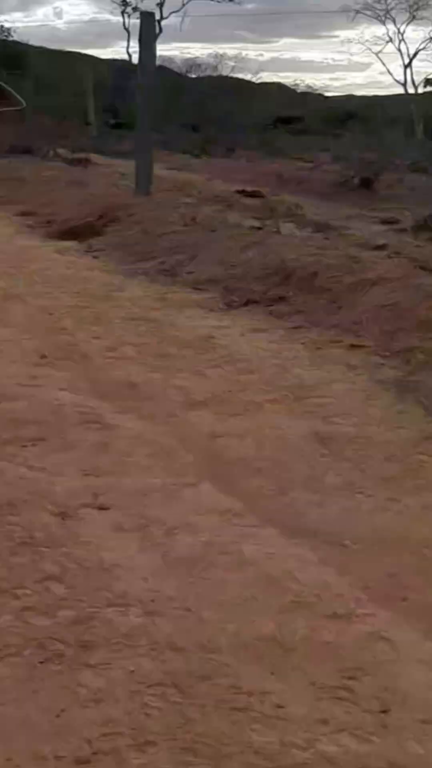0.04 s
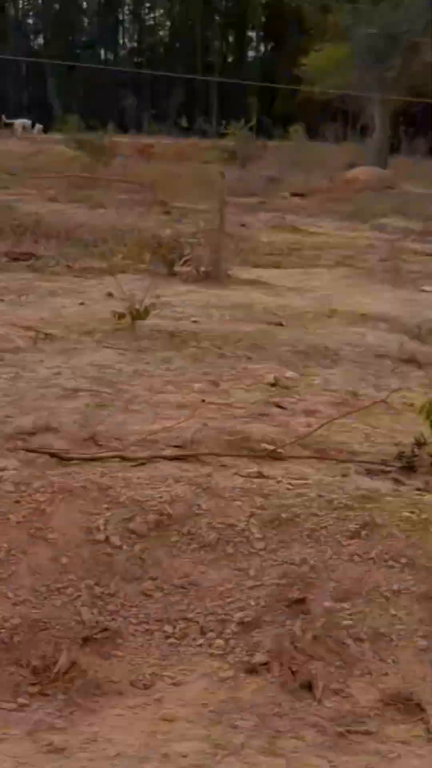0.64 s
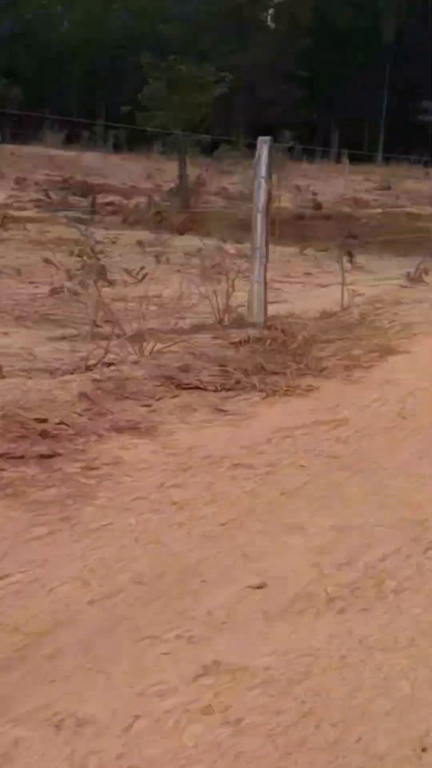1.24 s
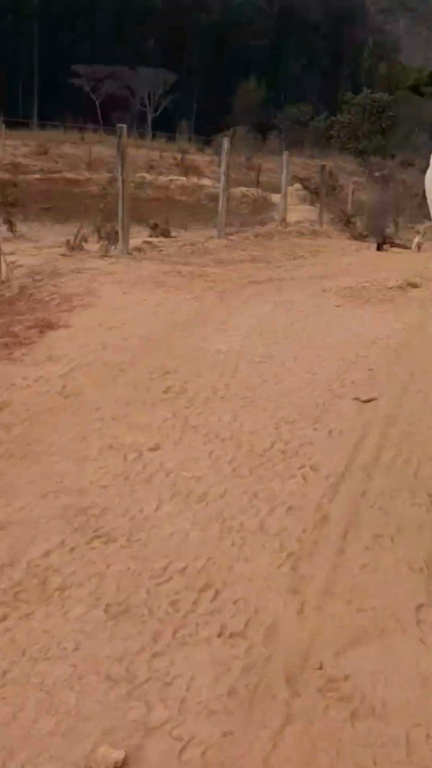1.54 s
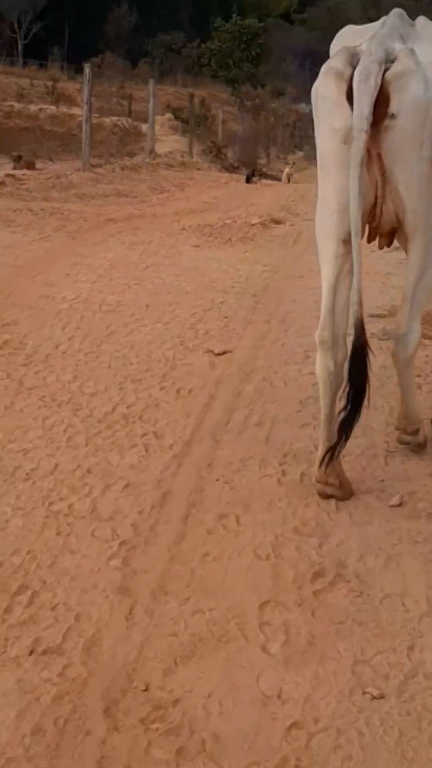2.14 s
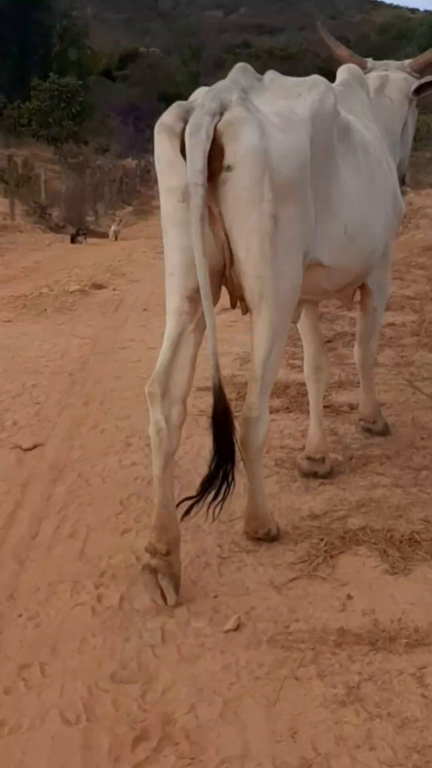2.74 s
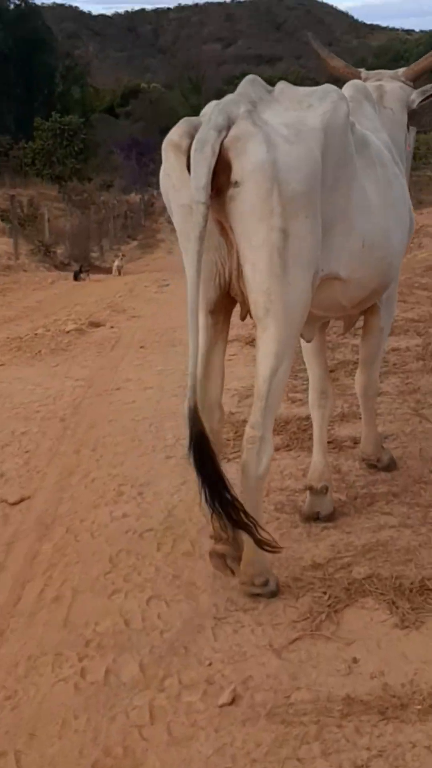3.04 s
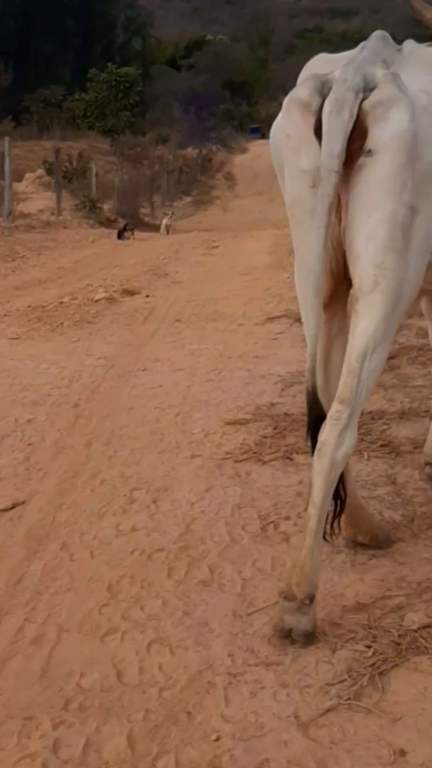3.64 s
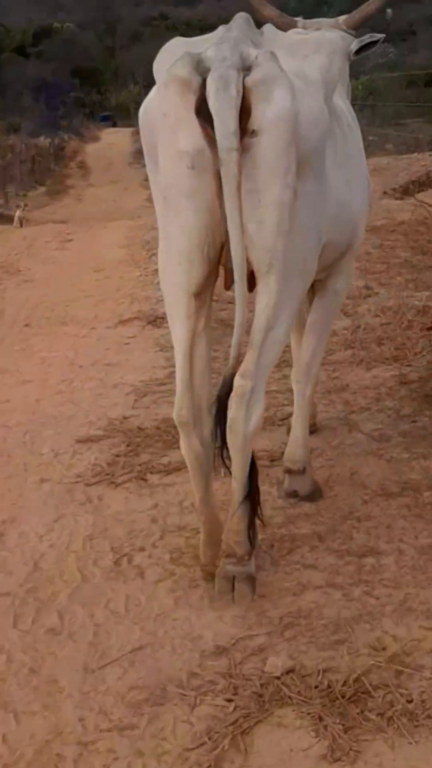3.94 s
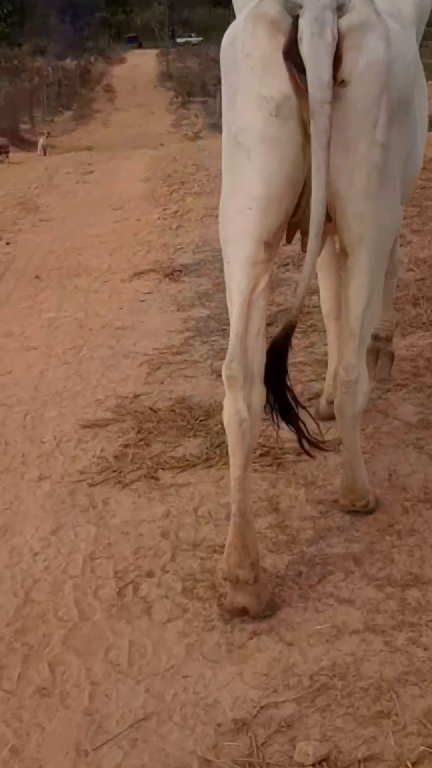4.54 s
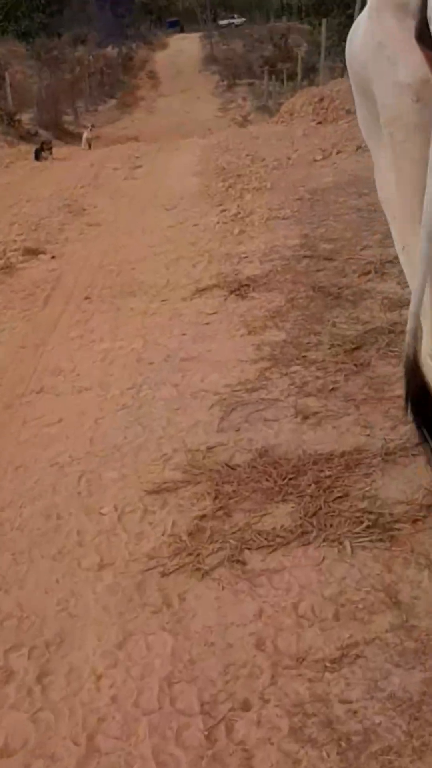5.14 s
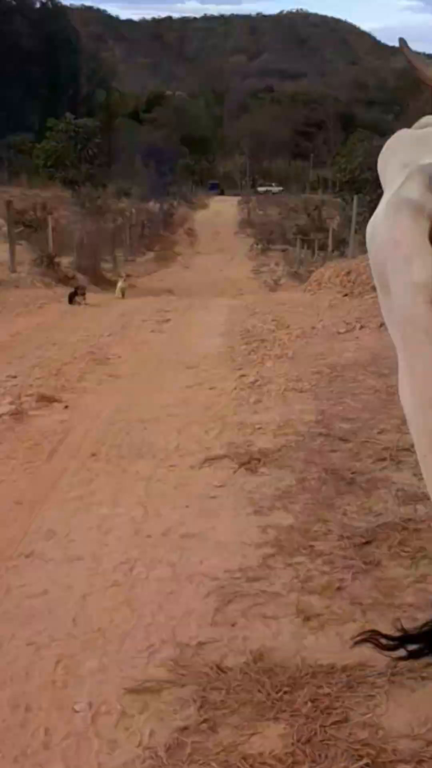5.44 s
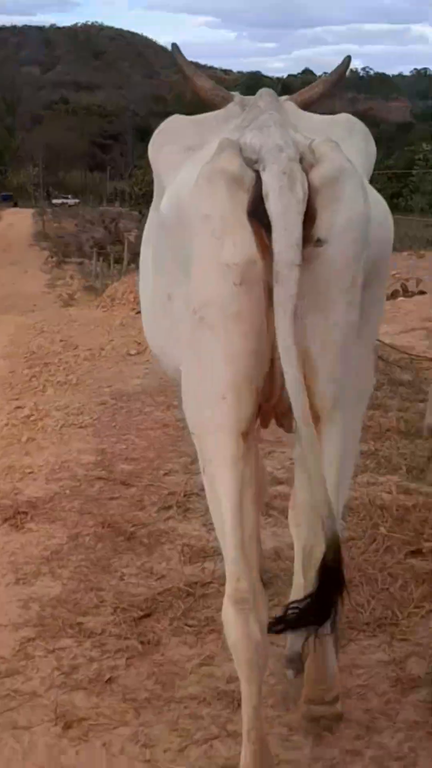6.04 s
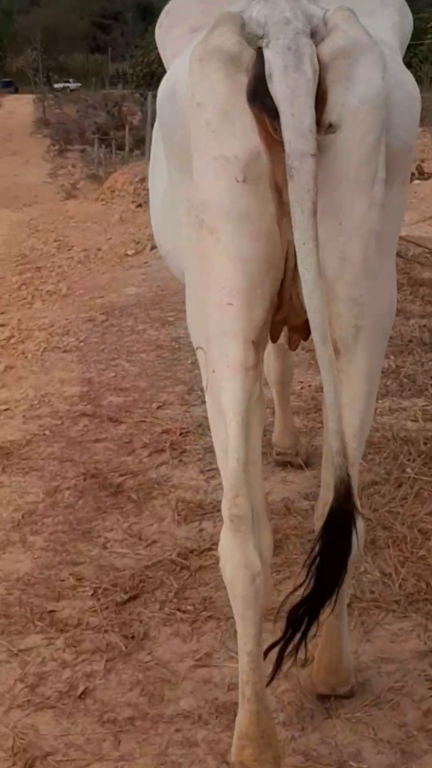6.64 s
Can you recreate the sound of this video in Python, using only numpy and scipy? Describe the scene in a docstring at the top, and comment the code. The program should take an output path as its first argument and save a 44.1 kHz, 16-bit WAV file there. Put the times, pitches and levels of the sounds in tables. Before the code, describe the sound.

A cow moos briefly, then again longer and louder with a rasp, while feet thud and scuff on dirt and straw.

```python
"""A dirt farm track with cattle: a short moo opens from a hum, then a long, rasping one runs down
into a creak. Each moo is a train of pulses from the vocal folds that rings in the throat, nose and
mouth. Feet thud and scuff on grit and dry straw, air buffets the microphone, and a high hiss swells
around each moo and at the end. A bird chirps nearby, faint whistles come and go, and the open
ground and trees give the calls a short echo."""
import sys
import numpy as np
from scipy import signal
from scipy.fft import rfft, irfft, next_fast_len
from scipy.io import wavfile
from scipy.ndimage import uniform_filter1d

SR = 44100
rng = np.random.default_rng(int(sys.argv[2]) if len(sys.argv) > 2 else 0)


def store_wav(level_fs):
    """Save 16-bit WAV to argv[1]."""
    pcm = np.round(np.clip(np.atleast_2d(level_fs), -1, 1) * 32767)
    wavfile.write(sys.argv[1], SR, pcm.T.astype(np.int16))


N = 299418
TIME = np.arange(N) / SR
FFT_SIZE = next_fast_len(N + 64)
BINS_HZ = np.fft.rfftfreq(FFT_SIZE, 1 / SR)
GROUND_LAG_MS = .48  # sound from the ground reaches the left microphone this much later

# loudness of the short moo: (time [s], level [dB])
SHORT_LEVEL = [(1.2, -54.5), (1.33, -39), (1.41, -33.5), (1.58, -36), (1.72, -32), (1.81, -28.5),
               (1.92, -28), (2.03, -37.5), (2.06, -50.5), (2.14, -70)]
# pitch of each moo: (time [s], pitch [Hz])
SHORT_PITCH = [(1.2, 66), (1.3, 69), (1.38, 77.3), (1.52, 78.8), (1.61, 80.7), (1.77, 77.8), (1.88, 79.6),
               (1.98, 74.6), (2.05, 63)]
LONG_PITCH = [(4.48, 54.9), (4.6, 60), (4.82, 63.1), (5.2, 63.7), (5.44, 67), (5.57, 56.5), (5.645, 40.5),
              (5.78, 35.8), (5.95, 32.5)]
# mouth in the short moo: (time [s], shape [0 lips parted, 1 shut, 2 wide open])
MOUTH_SHAPE = [(1.3, 0.15), (1.54, 0.13), (1.59, 1.17), (1.7, 0.97), (1.76, 1.63), (1.82, 1.69),
               (2.05, 1.6)]
# how each mouth shape colours the voice: (frequency [Hz], gain [dB])
LIPS_PARTED = [(30, -19), (79, -4.5), (157, -23), (236, -0.5), (315, -7), (392, -14.5), (470, -4),
               (550, -22), (710, -19.5), (800, -35.5), (1180, -25.5), (1400, -46), (2200, -41.5),
               (8000, -75)]
MOUTH_SHUT = [(40, -39), (80, -6.5), (160, -0.5), (240, -10.5), (320, -12), (400, -22), (640, -24.5),
              (720, -22), (850, -45), (1200, -58), (8000, -67)]
MOUTH_OPEN = [(30, -23), (79, -23.5), (158, -3.5), (237, 5.5), (316, -7.5), (395, -10.5), (630, -7),
              (710, -20), (790, -5.5), (1030, -13), (1300, -32.5), (1580, -18), (2030, -25.5), (2400, -36),
              (8000, -68)]
# air leaking through the vocal folds: (frequency [Hz], gain [dB])
BREATH_TONE = [(100, -0.5), (600, 4), (1300, 16), (2500, 13.5)]
# how hard the long moo is pushed: (time [s], effort [dB], jaw opening [0-1])
LONG_EFFORT = [(4.46, -61, 0), (4.52, -42.5, 0), (4.58, -37, 0.7), (4.7, -34, 0.98), (5.08, -27, 0.35),
               (5.33, -30, 0.7), (5.48, -27.5, 0.32), (5.61, -27, 0.34), (5.68, -34, 0.3),
               (5.85, -42, 0.37), (5.96, -52.5, 0)]
# throat in the long moo: (time [s], roughness [0-1], mouth's shift of the resonances [factor])
LONG_THROAT = [(4.48, 0.43, 0.87), (4.62, 0.41, 0.95), (4.8, 0.1, 0.92), (5.0, 0.06, 0.95),
               (5.2, 0.5, 0.98), (5.38, 0.94, 0.978), (5.6, 0.39, 0.94), (5.95, 0.5, 0.9)]
# moments when the vocal folds slam hardest: (time [s], relative strength [dB])
SLAMS = [(5.194, 4), (5.226, 5), (5.303, 4), (5.334, 8.5), (5.424, 4), (5.469, 6), (5.651, 4)]
# resonances in the long moo's low, middle and high band: (frequency [Hz], width [Hz], gain [dB])
NASAL_BOOM = [(135, 220, -7), (213, 22, 6), (248, 36, 19.5), (335, 150, -5)]
VOWEL = [(550, 47, -19), (652.3, 26, 14), (902, 47, 5), (1147, 18, -1.5)]
RASP = [(1600, 80, 8), (1720, 560, 7), (2010, 99, 0), (2400, 50, -18)]
# soft tissue damps what lies outside each band, one list a band: (frequency [Hz], gain [dB])
TISSUE = [[(15, -45), (30, -26), (65, -8), (125, -4.5), (500, -10.5), (1200, -28), (3000, -24)],
          [(150, -21.5), (450, -0.5), (1250, -5), (2000, -23.5), (4000, -50.5)],
          [(600, -28), (1400, 21.5), (2450, 23.5), (2800, 20), (5000, 16)]]
# each band's share of the effort: (with the jaw shut [dB], with it wide open [dB])
JAW_SHARE = [(0.5, -6.5), (-4.5, 0), (-25.5, -8)]
# how far the left microphone leads in each moo: (frequency [Hz], phase [radians])
SHORT_LEAD = [(0, 0.5), (1720, 0.34), (2930, 8.5), (7490, 4), (15200, 21), (16200, -3)]
LONG_LEAD = [(0, 0.5), (1380, -0.58), (6200, -4), (11800, -11), (14600, -4), (16200, -0.7)]

# steps: (time [s], length [s], relative footfall level [dB], relative scuff level [dB])
STEPS = [(0.211, 0.096, -57, -72), (0.543, 0.057, -72, -58.5), (0.694, 0.22, -61.5, -62),
         (1.129, 0.11, -54, -62), (1.209, 0.21, -47.5, -54), (2.157, 0.064, -56.5, -61.5),
         (2.496, .13, -64.5, -58), (2.68, 0.11, -64, -70.5), (2.999, 0.14, -54.5, -56.5),
         (3.206, 0.12, -88, -64), (3.495, 0.018, -64, -87), (3.708, 0.088, -52, -55.5),
         (3.887, 0.11, -61, -73), (4.157, 0.065, -58.5, -51.5), (4.279, 0.11, -59, -56.5),
         (4.446, 0.05, -69, -74), (6.031, 0.029, -51.5, -55), (6.216, 0.081, -62.5, -64),
         (6.319, 0.046, -52.5, -62), (6.432, 0.12, -50.5, -62), (6.64, 0.023, -53, -50),
         (6.698, 0.06, -59, -52)]
# dull thuds of feet: (time [s], relative level [dB], pitch [Hz])
THUDS = [(0.186, -55, 115), (0.634, -35, 80.7), (0.785, -34, 123), (0.926, -33, 128), (1.058, -35, 81),
         (2.858, -37, 231), (3.092, -42.5, 192), (3.724, -40, 156), (3.789, -32.5, 286),
         (6.394, -29.5, 81.6)]
# a hoof knocks a stone: (time [s], relative level [dB])
KNOCKS = [(.231, -36), (3.497, -53), (3.52, -53)]
# the ring of a knock: (frequency [Hz], gain [dB], time to fade by 60 dB [s])
KNOCK_RING = [(330, -5, .04), (500, 1, .025), (760, 1, .02), (1060, -1, .022)]
# snapping straw and crushed grit: (time [s], relative level [dB], centre [Hz], rise time [s])
SNAPS = [(.052, -67.5, 7950, 0.0039), (0.261, -70, 1270, .0025), (0.311, -56.5, 3160, 0.0017),
         (.5335, -55, 1480, 0.00095), (1.116, -60.5, 6500, 0.0012), (2.9888, -52, 2170, 0.0027),
         (3.027, -52.5, 1980, 0.0022), (3.274, -47.5, 2110, 0.0027), (3.5052, -55, 4630, 0.0013),
         (3.6788, -57, 1610, 0.0014), (4.092, -42.5, 10100, .0015), (4.1622, -49.5, 2370, 0.0059),
         (6.045, -53, 1590, .003), (6.0708, -41.5, 12100, 0.0009), (6.102, -47.5, 13400, .0015),
         (6.245, -47.5, 2340, .0013), (6.331, -53, 2510, 0.00084), (6.434, -41.5, 1920, 0.017),
         (6.5443, -39.5, 1850, 0.0042), (6.5966, -30, 12600, 0.00073), (6.6316, -41, 1760, 0.0035)]
# pushes of air: (time [s], length [s], relative level [dB])
GUSTS = [(.17, .07, -51), (.45, 0.045, -61.5), (.61, 0.058, -52), (.75, 0.065, -43.5), (.91, 0.033, -42),
         (1.01, 0.11, -56), (2.52, 0.031, -54.5), (2.68, 0.014, -51), (2.84, 0.019, -49.5),
         (3.08, 0.024, -52), (3.51, 0.023, -55), (3.71, 0.025, -52), (4.18, .03, -54.5), (5.87, 0.014, -43),
         (6.2, 0.094, -57), (6.39, .2, -41.5), (6.68, 0.16, -50)]
# a steady high hiss swells around each moo and again at the end: (time [s], relative level [dB])
HISS_LEVEL = [(0, -84), (.3, -74.5), (1.1, -71.5), (1.65, -62.5), (2.36, -69.5), (3.45, -69.5),
              (4.3, -63.5), (4.55, -55), (5.45, -59.5), (5.7, -60.5), (6.3, -65.5), (6.79, -56)]
# feet brush through straw: (time [s], length [s], relative level [dB], left minus right [dB])
BRUSHES = [(0.216, 0.077, -75, -5), (0.672, 0.069, -67, 1), (1.555, .025, -63, 8), (1.869, .03, -61.5, 1),
           (2.159, 0.11, -64, 1.5), (2.488, 0.064, -60.5, 4), (2.638, 0.063, -64.5, 6),
           (2.79, 0.065, -68, 3), (3.004, 0.27, -72, -3), (3.238, 0.044, -65.5, 3), (3.486, 0.038, -69, 7),
           (3.621, .1, -64, 4), (3.78, 0.19, -65.5, 3), (4.08, .025, -64, 5), (4.243, 0.21, -71, 2),
           (4.44, 0.071, -60, 5), (4.687, 0.064, -52, 5.5), (4.83, 0.059, -61.5, 9), (5.158, 0.068, -57, 8),
           (5.289, 0.19, -56, 6.5), (5.546, 0.016, -50, 7), (5.736, 0.043, -55.5, 6.5),
           (5.8, .14, -61, 3.5), (6.01, 0.043, -77.5, -20), (6.17, 0.069, -63.5, 5.5),
           (6.413, 0.16, -45, 0), (6.6, 0.026, -41.5, 1)]
# tone of each noise; the hiss is duller than the crunch: (frequency [Hz], gain [dB])
FOOTFALL_TONE = [(25, -75), (90, -12.5), (170, -8.5), (290, -5), (450, -11.5), (700, -17), (1500, -56)]
SCUFF_TONE = [(100, -51), (400, -5.5), (650, -3), (1000, 0.5), (1600, -1.5), (2300, -14), (2900, -12),
              (4500, -27)]
BUFFET_TONE = [(15, -27), (35, -18), (70, 1.5), (120, -0.5), (170, -7), (300, -54)]
HISS_TONE = [(1500, 4), (2800, -0.5), (4200, 0.5), (6000, -1.5), (8000, -6), (10300, -6), (12500, -3.5),
             (15500, -6)]
CRUNCH_TONE = [(1500, 1.5), (2800, -1), (4200, 1), (6000, -1), (8000, -2.5), (10300, -3.5), (12500, 1),
               (15500, -2)]
# extra treble at the right microphone, which faces the ground: (frequency [Hz], gain [dB])
RIGHT_TREBLE = [(3000, 3), (9000, 7.5), (13000, 5)]

# chirps: (time [s], top pitch [Hz], level [dB], treble tilt [dB per octave])
CHIRPS = [(1.875, 963, -44, -10), (2.506, 1057, -45, 7.5), (6.345, 1050, -58.5, 16),
          (6.707, 1041, -34.5, 8)]
# course of one chirp: (time from its start [s], share of top pitch [0-1], gain [dB])
CHIRP_ARCH = [(0, .9, -30), (.008, .94, -16), (.014, .99, -5), (.024, 1, -1), (.038, .98, 1),
              (.047, .93, -5), (.06, .85, -16), (.073, .81, -40)]
# how the bird's throat colours a chirp: (frequency [Hz], gain [dB])
BIRD_THROAT = [(1000, -38), (2050, 2.5), (3050, 11), (4200, -1), (5200, -8.5), (6400, -18), (8300, -28),
               (9500, -26), (12000, -38)]
# fuzzy whistles: (time [s], length [s], start pitch [Hz], end pitch [Hz], width [Hz], level [dB])
WHISTLES = [(.16, .07, 10900, 12900, 300, -74), (1.0, .6, 3950, 3850, 1200, -73),
            (2.9, .13, 11200, 12000, 600, -68), (3.0, .19, 11700, 11700, 1400, -65),
            (4.43, .1, 330, 470, 160, -50), (4.6, .12, 4500, 4450, 400, -63),
            (4.68, .55, 6900, 6900, 900, -67)]
# echo of the open ground and trees: (frequency [Hz], time to fade by 60 dB [s])
ECHO_DECAY = [(150, 0.62), (600, 0.41), (2000, 0.27), (8000, 0.028)]


def long_moo():
    """Slow, hard pulses ring the nose and the open mouth, then slow down to single creaks."""
    pitch, = curves(LONG_PITCH)
    rough, mouth = curves(LONG_THROAT)
    effort_db, jaw = curves(LONG_EFFORT)
    pulses = vocal_folds(pitch, jitter=.022 * rough, shimmer_db=2.5 * rough,
                         air=.16 + .16 * rough, puff_s=.01)
    # turn the ordinary beats down where a slam takes their place
    pulses *= 1 - .75 * sum(np.exp(-((TIME - s) / .009) ** 4) for s, _ in SLAMS)
    gate = during(LONG_EFFORT)
    voice = np.zeros(N)
    bands = zip([NASAL_BOOM, VOWEL, RASP], TISSUE, JAW_SHARE, [.6, .9, 1.4])
    for resonances, tissue, (shut_db, open_db), bite in bands:
        beats = pulses.copy()
        for s, db in SLAMS:  # a slam bites hardest in the high band
            add(beats, s, amp([bite * db]) * np.sqrt(SR / np.interp(s, TIME, pitch)))
        ring = sum(amp(db) * resonate(beats, hz * mouth, width) for hz, width, db in resonances)
        ring = colour(ring, tissue)
        level_db = effort_db + shut_db + (open_db - shut_db) * jaw
        voice += ring / np.std(ring[gate > 0]) * amp(level_db) * gate
    return lead_left(voice, LONG_LEAD) + amp(-15) * echo(voice)


def short_moo():
    """Clean pulses pass through parted lips, a closed hum, then an open mouth; both ends fray."""
    pitch, = curves(SHORT_PITCH)
    level_db, = curves(SHORT_LEVEL)
    shape, = curves(MOUTH_SHAPE)
    slack = np.clip((76 - pitch) / 10, 0, 1)  # slack folds beat unevenly and leak air
    pulses = vocal_folds(pitch, jitter=.002 + .04 * slack, shimmer_db=.8,
                         air=.14 + 1.5 * slack ** 2, puff_s=.008)
    voice = sum(unit(colour(pulses, tone)) * np.maximum(1 - abs(shape - k), 0)
                for k, tone in enumerate([LIPS_PARTED, MOUTH_SHUT, MOUTH_OPEN]))
    power = uniform_filter1d(uniform_filter1d(voice ** 2, size=1700), size=1700)
    voice /= np.sqrt(abs(power) + 1e-9)  # even out the loudness before shaping it
    voice *= amp(level_db) * during(SHORT_LEVEL)
    return lead_left(voice, SHORT_LEAD) + amp(-19) * echo(voice)


def vocal_folds(pitch, jitter, shimmer_db, air, puff_s):
    """Each time the folds shut they make a sharp pulse, followed by a puff of air."""
    cycles = np.cumsum(pitch) / SR + jitter * wander(30)  # uneven timing
    pulses = np.diff(np.floor(np.maximum.accumulate(cycles)), prepend=0)
    pulses *= amp(shimmer_db * wander(40)) * np.sqrt(SR / pitch)  # uneven strength
    puffs = fade_after(pulses, puff_s) * rng.standard_normal(N)
    return pulses + air * colour(unit(puffs), BREATH_TONE, size=1024)


def footsteps():
    """A foot lands, drags over the dirt with fading pressure, and lifts."""
    footfall = amp(2) * grainy(FOOTFALL_TONE, grain_db=3, shared=.87, flutter_db=4, flutter_hz=38.4)
    scuff = amp(-1) * grainy(SCUFF_TONE, grain_db=5.5, shared=.75, flutter_db=4, flutter_hz=130)
    scuff += pebbles()
    s, length, footfall_db, scuff_db = np.transpose(STEPS)
    weight, drag = (swells(zip(s, length, db), attack_s=.005, change_db=-1, release_s=.04)
                    for db in (footfall_db, scuff_db))
    # a faint stir remains between steps
    return footfall * np.hypot(weight, amp(-70)) + scuff * np.hypot(drag, amp(-82.5))


def pebbles(ticks_per_s=130, width_hz=630):
    """Small stones of three pitches grind under a sole, each with a short tick."""
    ticks = np.zeros(N)
    for hz in (950, 1330, 1900):
        hits = rng.standard_normal(N) * (rng.random(N) < ticks_per_s / SR)
        ticks += resonate(resonate(hits, hz, 2 * width_hz), hz, width_hz)
    return amp(-6) * delay_left(unit(ticks), GROUND_LAG_MS)


def foot_impacts(thud_s=.0042):
    """Feet thud on packed earth, a hoof knocks a stone, straws snap."""
    out, t = np.zeros(N), np.arange(SR // 8) / SR
    for s, db, hz in THUDS:
        thud = t / thud_s * np.exp(1 - t / thud_s) * np.sin(2 * np.pi * hz * t)
        add(out, s, amp(db - 1.5) * thud)
    contact = 1 - np.exp(-(t / .0016) ** 2)  # hoof meets stone softly
    ring = sum(amp(db - 60 * t / fade_s) * np.sin(2 * np.pi * hz * t) for hz, db, fade_s in KNOCK_RING)
    for s, db in KNOCKS:
        add(out, s, amp(db + 8.5) * contact * ring)
    for s, db, hz, rise_s in SNAPS:
        crack = unit(resonate(resonate(rng.standard_normal(len(t)), hz, hz), hz, hz))
        add(out, s, amp(db + .5) * crack * t / rise_s * np.exp(1 - t / rise_s))
    return delay_left(out, GROUND_LAG_MS) * amp([[-2], [1]])


def straw_and_hiss(breaks_per_s=3, pan_db=2):
    """Over a high hiss, stalks break at random and feet brushing the straw make a bright crunch."""
    hiss = amp(1.5) * grainy(HISS_TONE, grain_db=1.5, shared=.033, flutter_db=1.5, flutter_hz=57.5)
    crunch = amp(4) * grainy(CRUNCH_TONE, grain_db=3, shared=.16, flutter_db=1.5, flutter_hz=110)
    hiss_gain = amp(curves(HISS_LEVEL)[0])
    breaks = 1. * (rng.random(N) < breaks_per_s / SR)
    crackle = hiss_gain * amp(4) * fade_after(breaks, .001)
    s, length, db, brush_pan_db = np.transpose(BRUSHES)
    ears = []
    for ear, side in enumerate([.5, -.5]):
        rows = zip(s, length, db + side * brush_pan_db)
        brushes = swells(rows, attack_s=.027, change_db=2, release_s=.023)
        steady = hiss[ear] * hiss_gain * amp(side * pan_db)
        ears.append(steady + crunch[ear] * np.hypot(brushes, crackle))
    left, right = ears
    return np.array([left, colour(right, RIGHT_TREBLE, size=256)])


def air_buffet():
    """Air pushes on the microphone as it swings, making low rumbles."""
    rumble = amp(2) * grainy(BUFFET_TONE, grain_db=3.5, shared=.48, flutter_db=.5, flutter_hz=37.6)
    gusts = swells(GUSTS, attack_s=.017, change_db=0, release_s=.042)
    return rumble * np.hypot(gusts, amp(-72))  # a faint stir remains between gusts


def bird(wobble=.007):
    """Short chirps rise and fall in pitch; the throat favours the third harmonic."""
    out = np.zeros(N)
    at, arch, swell_db = np.transpose(CHIRP_ARCH)
    t = np.arange(0, at[-1], 1 / SR)
    for s, top_hz, db, tilt_db in CHIRPS:
        hz = top_hz * np.interp(t, at, arch) * (1 + wobble * wander(300)[:len(t)])
        phase = 2 * np.pi * np.cumsum(hz) / SR
        call = sum(amp(read(BIRD_THROAT, k * hz) + tilt_db * np.log2(k / 3)) * np.sin(k * phase)
                   for k in range(1, 12))
        add(out, s, amp(db + np.interp(t, at, swell_db)) * unit(call))
    return delay_left(out, lag_ms=.04) + amp(-21) * echo(out)


def whistles():
    """Faint tones, blurred by noise into airy whistles, swell and fade."""
    out = np.zeros((2, N))
    for s, length, start_hz, end_hz, width, db in WHISTLES:
        n = int(length * SR)
        tone = np.sin(2 * np.pi * np.cumsum(np.linspace(start_hz, end_hz, n)) / SR)
        fuzz = wander(width / 2)[:2 * n].reshape(2, n)
        add(out, s, amp(db) * unit(tone * fuzz * np.hanning(n)))
    return out


def echo(x, size=32768):
    """Ground, bank and trees scatter a sound back from four directions; the treble fades first."""
    lags_ms = GROUND_LAG_MS * np.linspace(-1, 1, num=4)
    shape = (len(lags_ms), size)
    bounces = rng.standard_normal(shape) * (rng.random(shape) < .02) * (np.arange(size) > .003 * SR)
    hz, t, spectra = signal.stft(bounces, SR, nperseg=256)
    decay = amp(-60 * t / read(ECHO_DECAY, hz)[:, None])
    tails = signal.istft(spectra * decay, SR, nperseg=256)[1]
    left = sum(np.roll(tail, round(lag * SR / 1000)) for tail, lag in zip(tails, lags_ms))
    ears = np.array([left, tails.sum(0)]) / np.linalg.norm(tails)
    return signal.fftconvolve(x[None], ears, axes=1)[:, :N]


def grainy(tone, grain_db, shared, flutter_db, flutter_hz):
    """Stereo noise of uneven grains in clumps; `shared` (0-1) is the part both sides hear."""
    grains = amp(grain_db * wander(1500) + flutter_db * wander(flutter_hz))
    direct, *scattered = (unit(colour(noise * grains, tone)) for noise in rng.standard_normal((3, N)))
    both_sides = np.sqrt(shared) * delay_left(direct, GROUND_LAG_MS)
    return both_sides + np.sqrt(1 - shared) * np.array(scattered)


def swells(rows, attack_s, change_db, release_s):
    """Loudness curve of events that rise, drift by change_db while they last, and die away."""
    power, t = np.zeros(N), np.arange(SR // 2) / SR
    for s, length, db in rows:
        held = np.minimum(t / attack_s, 1) * amp(db + change_db * np.minimum(t / length, 1))
        add(power, s, (held * np.exp(-np.maximum(t - length, 0) / release_s)) ** 2)
    return np.sqrt(power)


def delay_left(x, lag_ms):
    """Sound reaches the left microphone later than the right."""
    return np.array([np.roll(x, round(lag_ms * SR / 1000)), x])


def lead_left(x, lead):
    """The two microphones hear a voice out of step, by an amount that depends on frequency."""
    left = irfft(rfft(x, FFT_SIZE) * np.exp(1j * read(lead, BINS_HZ)), FFT_SIZE)[:N]
    return np.array([left, x])


def colour(x, tone, size=8192):
    """Gives a sound a tone, with a filter that rings only after the sound arrives."""
    log_gain = np.log(amp(read(tone, abs(np.fft.fftfreq(size, 1 / SR)))))
    response = np.fft.ifft(np.exp(np.conj(signal.hilbert(log_gain)))).real
    return signal.oaconvolve(x, response[:size // 2])[:N]


def resonate(x, hz, width):
    """Rings around one frequency, which may glide."""
    turn = np.exp(2j * np.pi * np.cumsum(hz * np.ones(len(x))) / SR)
    decay = np.exp(-np.pi * width / SR)
    return 2 * (turn * signal.lfilter([1 - decay], [1, -decay], x / turn)).real


def fade_after(pulses, decay_s):
    """Gives each pulse a fading tail."""
    return signal.lfilter([1], [1, -np.exp(-1 / (decay_s * SR))], pulses)


def wander(hz):
    """A random wobble, no faster than hz."""
    return unit(irfft(rfft(rng.standard_normal(FFT_SIZE)) * (BINS_HZ < hz), FFT_SIZE)[:N])


def read(points, hz):
    """Looks up a table's value at a frequency, on a log scale."""
    table_hz, value = np.transpose(points)
    return np.interp(np.log(hz + 1), np.log(table_hz + 1), value)


def curves(rows):
    """Turns a table's columns into curves over time."""
    s, *columns = np.transpose(rows)
    return [np.interp(TIME, s, column) for column in columns]


def during(rows, fade_s=.013):
    """One while a table lasts, fading to zero outside."""
    return np.clip(np.minimum(TIME - rows[0][0], rows[-1][0] - TIME) / fade_s + 1, 0, 1)


def add(mix, s, sound):
    """Mixes a sound in at s seconds."""
    part = mix[..., max(round(s * SR), 0):][..., :sound.shape[-1]]
    part += sound[..., :part.shape[-1]]


def amp(db):
    """Decibels to gain."""
    return 10 ** (np.asarray(db) / 20)


def unit(x):
    """Scales to an average (rms) level of 1."""
    return x / np.sqrt(np.mean(x ** 2) + 1e-20)


def scene():
    """Everything on the track."""
    moos = short_moo() + long_moo()
    return moos + air_buffet() + footsteps() + straw_and_hiss() + foot_impacts() + bird() + whistles()


def record(dry, cutoff_hz=15850):
    """Cuts off the highest treble."""
    lowpass = signal.firwin(511, cutoff_hz, window=("kaiser", 9), fs=SR)
    return signal.oaconvolve(dry, lowpass[None], "same")


dry = scene()
out = record(dry)
store_wav(out)
```